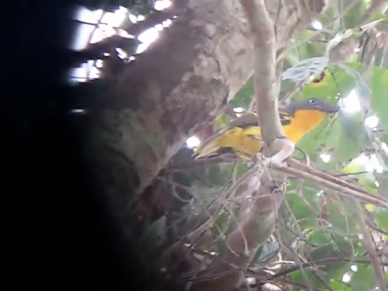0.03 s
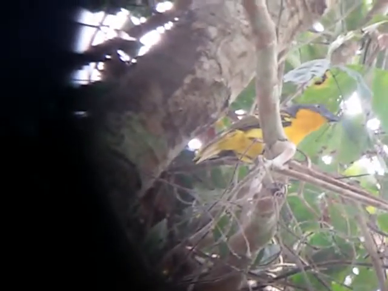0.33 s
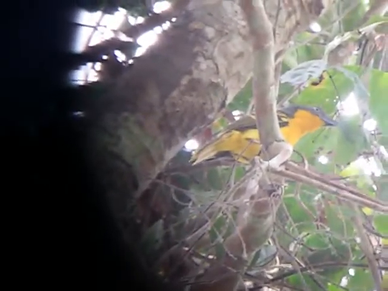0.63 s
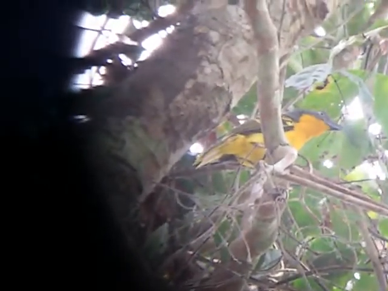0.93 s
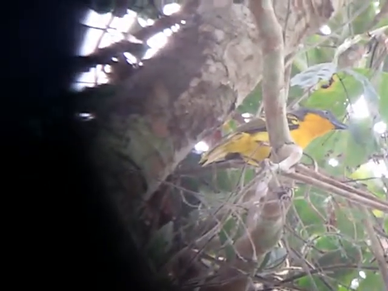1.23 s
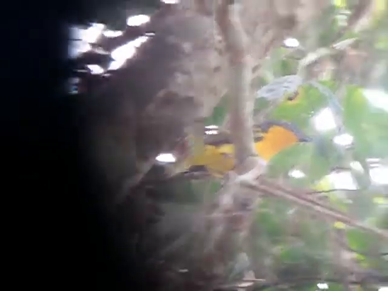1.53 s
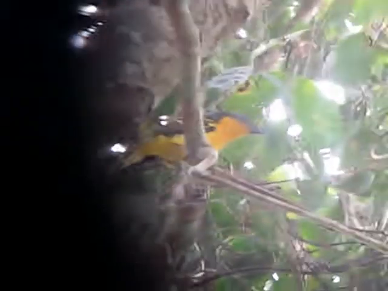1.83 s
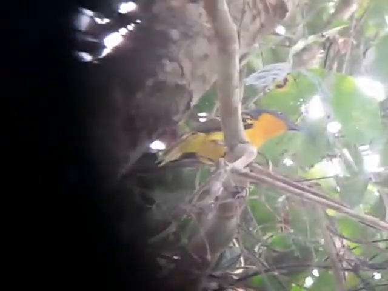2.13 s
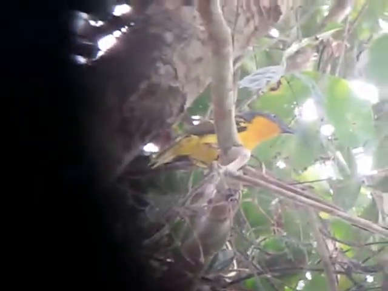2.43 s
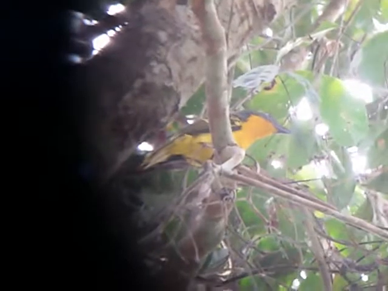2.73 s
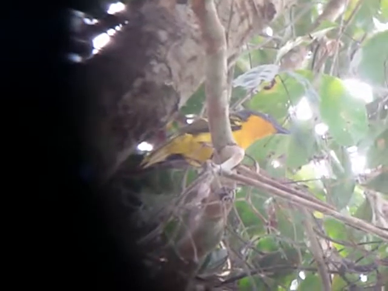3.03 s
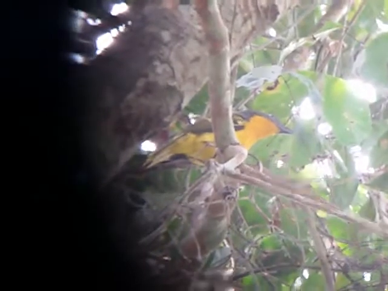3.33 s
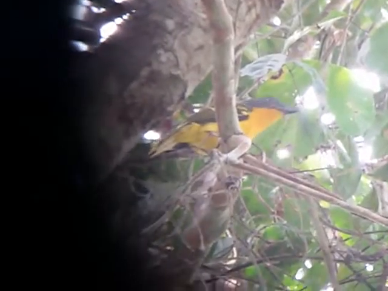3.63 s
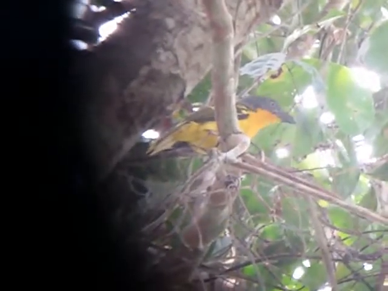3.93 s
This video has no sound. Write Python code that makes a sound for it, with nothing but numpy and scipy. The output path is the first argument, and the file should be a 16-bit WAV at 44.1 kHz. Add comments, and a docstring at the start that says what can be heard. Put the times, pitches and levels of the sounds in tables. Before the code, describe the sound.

A nearby bird gives three bursts of harsh rattles and falling slurs, then two pairs of short whistles with raspy ends. A twig ticks between the pairs. Insects buzz and distant birds call in the softly echoing forest.

```python
"""A forest, one microphone, a bird on a branch nearby. From the start insects buzz near 7 kHz over a low
murmur, and other birds call far off. The near bird opens with three bursts of harsh, pulsed rattles and
quick falling slurs; two clear whistles join the last burst. From 2.3 s it gives two pairs of short
whistles that crack into raspy ends. Between the pairs come two soft thuds and the loudest of a few twig
ticks. All along, the trees return a soft echo."""
import sys
import numpy as np
from scipy import signal
from scipy.fft import rfft, irfft
from scipy.io import wavfile

SR = 44100
rng = np.random.default_rng(int(sys.argv[2]) if len(sys.argv) > 2 else 0)


def persist_wave(psi):
    """Save psi, clipped to +-1, as 16-bit WAV."""
    counts = np.round(np.clip(psi, -1, 1) * 32767).astype(np.int16)
    wavfile.write(sys.argv[1], SR, np.atleast_2d(counts).T)


N = 176400


def amp(db):
    """Decibels to gain."""
    return 10 ** (np.asarray(db) / 20)


def unit(x):
    """Scales to rms 1."""
    return x / np.sqrt(np.mean(abs(x) ** 2) + 1e-20)


def spectrum_at(points, hz):
    """Reads a spectrum table on a log-frequency axis."""
    f, value = np.transpose(points)
    return np.interp(np.log(hz + 1), np.log(f), value)


def gain_curve(points):
    """Gain over time from a level table."""
    return amp(np.interp(np.arange(N) / SR, *np.transpose(points)))


def play(source, rows):
    """One sound for each row, starting at the time in its first column."""
    track = np.zeros(N)
    for start, *settings in rows:
        sound = source(*settings)
        slot = track[round(start * SR):][:len(sound)]
        slot += sound[:len(slot)]
    return track


def colour(x, points):
    """Filters by a spectrum table."""
    return irfft(rfft(x) * amp(spectrum_at(points, np.fft.rfftfreq(N, 1 / SR))), N)


def wander(hz, t, size=16384):
    """Smooth random motion up to a rate, rms about 1, as long as t."""
    f = np.fft.rfftfreq(size, 1 / SR)
    return unit(irfft(rfft(rng.standard_normal(size)) / (1 + (f / hz) ** 4), size))[:len(t)]


def gate(t, rise_s, fall_s):
    """Linear fade in and out."""
    return np.clip(t / rise_s, 0, 1) * np.clip((t[-1] - t) / fall_s, 0, 1)


def phase_of(hz):
    """Phase of a pitch curve."""
    return 2 * np.pi * np.cumsum(hz) / SR


def hoarse_tone(t, hz, width_hz):
    """A steady or gliding tone smeared into a narrow band of noise."""
    smear = wander(width_hz / 2, t) + 1j * wander(width_hz / 2, t)
    return unit((smear * np.exp(1j * phase_of(hz + np.zeros_like(t)))).real)


# Near bird on its branch, rattles: t/s, length/s, centre f/Hz, level before the beak/dB, level change/dB,
# roughness/0-1
RATTLE_BURSTS = [(.07, 0.027, 2050, -53.5, -12, 0.6), (0.108, 0.064, 2165, -50.5, -5.5, 0.9),
                 (0.214, 0.011, 2130, -57.5, 6, 0.7), (0.246, 0.042, 2272, -49.5, -6, 0.88),
                 (0.617, 0.025, 2054, -61.5, 2, .8), (0.659, 0.072, 2280, -56.5, -4, 0.87),
                 (0.768, 0.0345, 2400, -57.5, 6, 0.65), (0.797, .03, 2150, -57, -4, .8),
                 (1.076, 0.048, 2636, -50, 4, 0.9), (1.113, 0.055, 2614, -45, 2.5, 0.65),
                 (1.169, .032, 2550, -46, -11, .7), (1.199, 0.027, 2278, -39.5, -4, 0.67),
                 (1.213, 0.089, 2433, -46, -0.5, 0.5), (1.2905, .036, 2444, -37.5, -1, 0.44),
                 (1.326, 0.034, 2540, -39, -4, 0.54), (1.3757, 0.031, 2445, -34.5, -8, 0.57)]
def rattle(length, hz, db, change_db, rough):
    """Uneven pulses chop a tone that starts high and falls again and again."""
    t = np.arange(0, length, 1 / SR)
    pulses_per_s, pulse_width_s, sweeps_per_s = 410, 0.00048, 80
    gap_scatter, pulse_db, half_turns = rng.standard_normal((3, 60))
    pulse_times = (np.cumsum(np.exp(0.244 * gap_scatter)) - .5) / pulses_per_s
    shapes = np.exp(-.5 * ((t - pulse_times[:, None]) / pulse_width_s) ** 2)
    pulses = unit((amp(pulse_db) * np.exp(1j * np.pi * half_turns)) @ shapes)
    sweep = .27 * (.5 - t * sweeps_per_s % 1)
    high_start = 0.17 * np.exp(-t / 0.0029)
    tone = np.exp(1j * phase_of(hz * (1 + sweep + high_start)))
    chop = rough * pulses + (1 - rough) * (.5 + abs(pulses))  # rough: phase jumps; smooth: a throb
    hiss = rough * amp(-8) * abs(pulses) * rng.standard_normal(SR)[:len(t)]
    return amp(db + change_db * t / length) * gate(t, .0015, 0.0017) * unit((chop * tone).real + hiss)


# The beak's response to the rattles: f/Hz, gain/dB
BEAK_RESPONSE = [(500, -54), (1300, -38), (1520, 6), (2000, -4), (2300, -5), (2500, 0), (2900, -5),
                 (3250, -18.5), (3700, -1.5), (5000, -2), (9000, -19), (14000, -48)]
def beak(rattles):
    """The beak passes the middle of the rattles and cuts their lows and highs."""
    return colour(rattles, BEAK_RESPONSE)


# Near bird, slurs: t/s, length/s, first f/Hz, last f/Hz, relative level/dB, octave before the beak/dB
SLUR_NOTES = [(0.074, 0.018, 2456, 2330, -50, -12), (0.086, 0.024, 2270, 1440, -51.5, -5),
              (0.109, .016, 2150, 1530, -55, -19), (.126, .014, 2034, 1540, -53, -8),
              (0.227, 0.021, 1992, 1474, -49, -6), (.257, 0.017, 1904, 1580, -51.5, -10),
              (0.62, 0.022, 2370, 2405, -52.5, -19), (0.64, 0.021, 2147, 1490, -57, -6),
              (.664, .012, 1740, 1500, -56, -7), (.745, 0.024, 1934, 1460, -54.5, -3.5),
              (.768, .024, 2080, 1490, -55, -14), (1.076, 0.0076, 1980, 2180, -44.5, -19),
              (1.083, 0.036, 2205, 1500, -50, -26), (1.117, 0.028, 2134, 1536, -51.5, -28),
              (1.168, .036, 2193, 1574, -45, -15), (1.255, .036, 2230, 1585, -46, -8),
              (1.341, 0.032, 2185, 1545, -49, -14)]
# The beak's response to the octave: f/Hz, gain/dB
BEAK_OCTAVE_RESPONSE = [(3000, -5), (3300, -3), (3600, 1.5), (4100, -6), (4800, -1)]
def slur(length, first_hz, last_hz, db, octave_db):
    """A quick, shaky glide; its hoarse octave is strongest where the beak lets it through."""
    t = np.arange(0, length, 1 / SR)
    progress = t / length
    hz = first_hz + (last_hz - first_hz) * progress ** 1.473
    phase = phase_of(hz * (1 + 0.022 * wander(400, t)))
    octave_gain = amp(octave_db + spectrum_at(BEAK_OCTAVE_RESPONSE, 2 * hz))
    octave = octave_gain * np.sin(2 * phase + .9 * wander(520, t))
    shaky_fade = amp(db - 2.25 - 1.5 * progress + 1.4 * wander(320, t))
    return shaky_fade * gate(t, 0.002, 0.002) * unit(np.sin(phase) + octave)


# Near bird, rasp above the rattles and slurs: t/s, length/s, centre f/Hz, width/Hz, level/dB
RASP_BANDS = [(.071, 0.053, 3650, 200, -61), (0.072, 0.046, 4450, 500, -62), (0.184, 0.043, 3850, 700, -63),
              (.621, 0.038, 3620, 160, -59.5), (0.624, 0.05, 4400, 495, -69), (1.086, .016, 3550, 200, -57),
              (1.17, 0.029, 4150, 800, -59), (1.257, .03, 4020, 600, -62), (1.29, 0.015, 4550, 400, -61),
              (1.344, 0.035, 3950, 458, -55), (1.083, .02, 4510, 400, -60)]
def rasp(length, hz, width_hz, db):
    """Rough overtones of the voice as a syllable opens."""
    t = np.arange(0, length, 1 / SR)
    return amp(db) * gate(t, 0.002, 0.0094) * hoarse_tone(t, hz, width_hz)


# Near bird, whistles: t/s, length/s, held f/Hz, scoop/Hz, end bend/Hz, level/dB, third harmonic/dB
WHISTLE_NOTES = [(1.201, 0.051, 1786, 8, -70, -49, -23), (1.399, .054, 1734, -82, 151, -41.5, -17.5),
                 (2.284, 0.046, 1840, 178, -43, -47.5, -13), (2.485, .050, 1842, 336, -90, -46.5, -18),
                 (3.15, .052, 1798, 231, -73, -52.5, -11), (3.353, 0.059, 1809, 102, 17, -49, -16)]
def whistle(length, hz, scoop_hz, bend_hz, db, third_db):
    """A pure note scoops to its pitch and bends at the end; a weak third harmonic swells in its middle."""
    t = np.arange(0, length, 1 / SR)
    progress = t / length
    pitch = hz - scoop_hz * np.exp(-t / 0.0119) + bend_hz * progress ** 3
    phase = phase_of(pitch * (1 + 0.0067 * wander(170, t)))
    third = amp(third_db) * np.sin(np.pi * progress) * np.sin(3 * phase)
    return amp(db + 0.28 * wander(90, t)) * gate(t, .009, 0.002) * unit(np.sin(phase) + third)


# Near bird, ends of the paired whistles: t/s, length/s, lower f/Hz, lower level/dB, upper re lower/dB
VOICE_BREAKS = [(2.334, 0.033, 1927, -62.5, 2), (2.536, 0.062, 1990, -63, 4.5),
                (3.202, .043, 2000, -56.5, -9.5), (3.403, .038, 1973, -58, -9)]
def voice_break(length, hz, db, upper_db):
    """The whistle cracks into two fading hoarse tones, the lower one rising."""
    t = np.arange(0, length, 1 / SR)
    from_middle = t / length - .5
    lower = hoarse_tone(t, hz + 140 * from_middle, width_hz=370)
    upper = amp(upper_db) * hoarse_tone(t, hz=2516, width_hz=230)
    return amp(db - 5.5 * from_middle) * gate(t, 0.0011, 0.0042) * (lower + upper)


# A twig near the microphone: t/s, level/dB
TWIG_TICKS = [(0.8412, -51.5), (2.1896, -48.5), (2.8075, -31.5), (2.8234, -54)]
# Its modes: f/Hz, relative level/dB, t60/s
TWIG_MODES = [(1940, -35, 0.0078), (4050, -9, 0.022), (4960, -9.5, 0.0075), (7300, 0, 0.0078),
              (9140, -15, 0.015)]
def twig_tick(db):
    """A twig snaps and rings for a moment."""
    t = np.arange(1500) / SR
    ring = sum(amp(mode_db - 60 * t / t60) * np.sin(2 * np.pi * hz * t) for hz, mode_db, t60 in TWIG_MODES)
    noise = signal.lfilter(*signal.butter(4, 8500, fs=SR), rng.standard_normal(len(t)))
    crack = 0.32 * np.exp(-t / 0.002) * noise
    return amp(db) * np.minimum(t / 0.00043, 1) * (ring + crack)


# Low thuds nearby: t/s, relative level/dB
THUDS = [(2.715, -61), (2.867, -60)]
def thud(db):
    """A dull, very soft puff of low noise."""
    t = np.arange(0, 0.039, 1 / SR)
    return amp(db) * gate(t, 0.0027, 0.072) * hoarse_tone(t, hz=109.6, width_hz=180)


# Birds deep in the forest, plain notes: t/s, length/s, f/Hz, relative level/dB
FAR_NOTES = [(.15, 0.081, 1496, -73), (.31, 0.055, 1500, -68.5), (.44, 0.038, 1494, -69.5),
             (.87, 0.045, 1479, -65.5), (1.55, 0.075, 1491, -70), (1.77, 0.06, 1500, -71),
             (1.86, 0.048, 1487, -69.5), (2.31, 0.074, 1502, -67.5), (2.52, 0.077, 1495, -72),
             (2.74, 0.087, 1506, -71), (2.95, .09, 1494, -71.5), (3.21, 0.04, 1474, -64),
             (3.71, 0.055, 1478, -68), (3.94, 0.067, 1506, -71.5)]
def far_toot(length, hz, db):
    """A soft, slightly wavering note from far away."""
    t = np.arange(0, length, 1 / SR)
    pitch = hz * (1 + 0.016 * wander(90, t))
    return amp(db) * gate(t, 0.019, 0.029) * unit(np.sin(phase_of(pitch)))


# Birds deep in the forest, buzzes: t/s, length/s, centre f/Hz, glide/Hz, width/Hz, relative level/dB
FAR_PHRASES = [(1.901, 0.14, 2583, 75, 240, -72), (1.949, .19, 3410, 585, 900, -71.5),
               (1.992, 0.12, 4390, 333, 554, -64), (2.163, 0.16, 2587, -89, 302, -67),
               (2.277, 0.18, 4220, -7, 950, -64), (2.368, 0.14, 3193, -13, 220, -67.5),
               (2.58, 0.17, 4320, 149, 700, -63), (2.58, 0.28, 3330, -2.5, 1270, -71),
               (2.755, 0.13, 3160, 0, 220, -69), (2.952, 0.12, 2570, 8, 260, -67.5),
               (3.042, 0.151, 4150, 188, 607, -68.5)]
def far_buzz(length, hz, glide_hz, width_hz, db):
    """A buzzy phrase blurred by distance."""
    t = np.arange(0, length, 1 / SR)
    pitch = hz + glide_hz * (t / length - .5)
    return amp(db) * gate(t, 0.02, 0.058) * hoarse_tone(t, pitch, width_hz)


# Insects behind the birds, spectrum before the band filter: f/Hz, relative density/dB
INSECT_SPECTRUM = [(3290, -45), (5600, -18), (5800, -20.5), (6160, -10.5), (6530, -3), (7100, -0.5),
                   (7330, -3), (7600, -12), (7690, -11), (8400, -35), (10900, -51), (18500, -120)]
# Their swells: t/s, relative level/dB
INSECT_SWELLS = [(0.0, -55), (0.54, -58), (0.68, -55), (1.01, -56), (1.02, -53), (1.28, -52.5),
                 (1.36, -48.5), (1.55, -51.5), (1.56, -57), (1.63, -52.5), (1.82, -56), (1.86, -52),
                 (1.97, -56.5), (2.04, -55), (2.22, -55), (2.37, -51.5), (2.8, -53), (2.81, -49.5),
                 (2.85, -54.5), (2.93, -53), (3.25, -52.5), (3.26, -56.5), (3.39, -51), (3.45, -55.5),
                 (3.97, -54), (4.0, -54)]
def insects():
    """Many insects merge into a fluttering band that swells and sinks."""
    hz = np.fft.rfftfreq(N, 1 / SR)
    band_filter = 1 / (1 + ((hz - 7000) / 1500) ** 8)
    spectrum = amp(spectrum_at(INSECT_SPECTRUM, hz)) * band_filter
    buzz = unit(irfft(rfft(rng.standard_normal(N)) * spectrum, N))
    flutter = amp(-0.25 + 0.73 * wander(45, np.arange(N) / SR, size=N))
    return buzz * gain_curve(INSECT_SWELLS) * flutter


# Forest air at the microphone, before it is split into murmur and hiss: f/Hz, relative density/dB
AIR_SPECTRUM = [(20, 0), (38, -30), (65, 0.5), (130, -2), (300, -3), (600, -6.5), (1300, -8.5), (2500, -6),
                (3300, -7.5), (4300, -7.5), (5300, -5), (7000, -9), (8800, -9.5), (10500, -14),
                (14500, -15)]
# The murmur's swells: t/s, relative level/dB
MURMUR_SWELLS = [(0.0, -70.5), (0.28, -67), (0.31, -70), (0.89, -70), (1.45, -62.5), (1.58, -68),
                 (1.9, -69), (2.62, -67), (3.6, -69), (4.0, -68)]
def forest_air():
    """Low forest murmur that swells a little, under a hiss that partly follows the insects."""
    noise = unit(colour(rng.standard_normal(N), AIR_SPECTRUM))
    low = signal.sosfiltfilt(signal.butter(2, 1400, fs=SR, output="sos"), noise)
    murmur = amp(-0.5) * gain_curve(MURMUR_SWELLS) * unit(low)
    hiss = amp(-63) * unit(gain_curve(INSECT_SWELLS) ** 0.7) * (noise - low)
    return murmur + hiss


def branch_reflections(x, count=24, latest_s=.06):
    """Early reflections from nearby wood, the later ones weaker."""
    taps = np.zeros(SR // 4)
    lateness = rng.uniform(0.0398, 1, count)
    taps[(lateness * latest_s * SR).astype(int)] = rng.choice([-1, 1], count) * np.exp(-lateness)
    return signal.fftconvolve(x, taps / np.linalg.norm(taps))[:N]


# Decay among the surrounding trees: f/Hz, t60/s
FOREST_DECAY = [(500, 1), (1800, 0.85), (2600, 0.87), (5000, 0.76), (10000, 0.23)]
def forest_echo(x, echoes_per_s=2500):
    """Scattered echoes from trunks and leaves, dying faster in the treble."""
    build_up = np.minimum(np.arange(SR) / SR / 0.0086, 1)
    taps = rng.standard_normal(SR) * (rng.random(SR) < echoes_per_s / SR) * build_up
    hz, t, bands = signal.stft(taps, SR, nperseg=256)
    decay = amp(-60 * t / spectrum_at(FOREST_DECAY, hz)[:, None])
    tail = signal.istft(bands * decay, SR, nperseg=256)[1]
    return signal.fftconvolve(x, tail / np.linalg.norm(tail))[:N]


def scene():
    """The near bird, far birds and insects at one microphone, the same in both channels."""
    harsh_calls = beak(play(rattle, RATTLE_BURSTS)) + play(slur, SLUR_NOTES)
    harsh_calls += play(rasp, RASP_BANDS) + play(voice_break, VOICE_BREAKS)
    knocks = play(twig_tick, TWIG_TICKS) + play(thud, THUDS)
    whistles = play(whistle, WHISTLE_NOTES)
    near = harsh_calls + knocks + whistles
    far = play(far_toot, FAR_NOTES) + play(far_buzz, FAR_PHRASES)
    echo = forest_echo(amp(-12) * (harsh_calls + knocks) + amp(-14.5) * whistles + amp(-0.5) * far)
    early = amp(-11.5) * branch_reflections(near)
    mono = near + early + amp(-1) * far + echo + insects() + forest_air()
    return np.array([mono, mono])


def record(dry, cutoff_hz=14650):
    """The recorder's band limit."""
    lowpass = signal.firwin(511, cutoff_hz, window=("kaiser", 9), fs=SR)
    return signal.oaconvolve(dry, lowpass[None], "same")


dry = scene()
out = record(dry)
persist_wave(out)
```